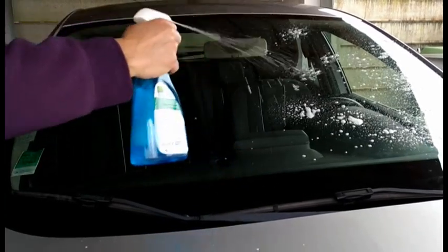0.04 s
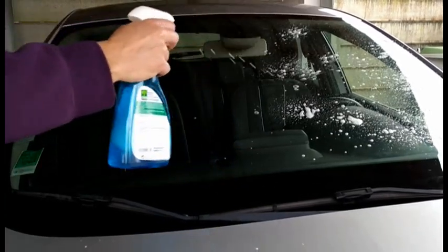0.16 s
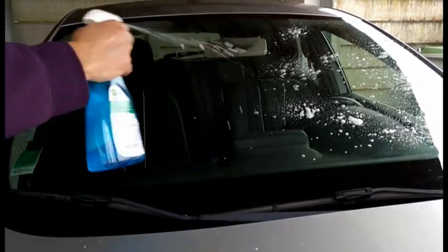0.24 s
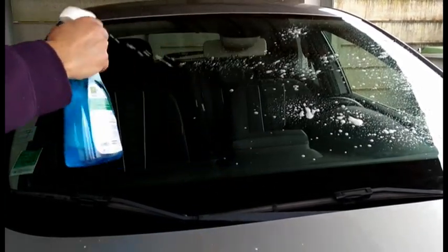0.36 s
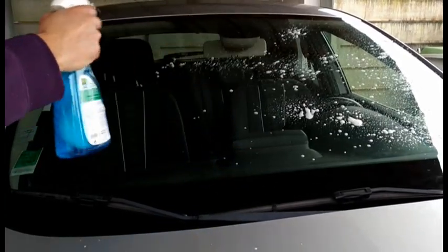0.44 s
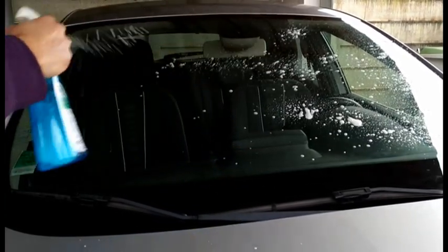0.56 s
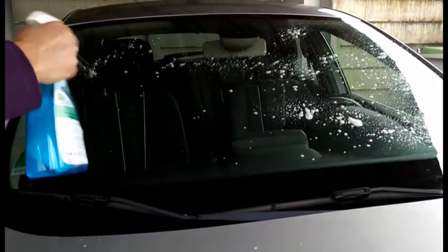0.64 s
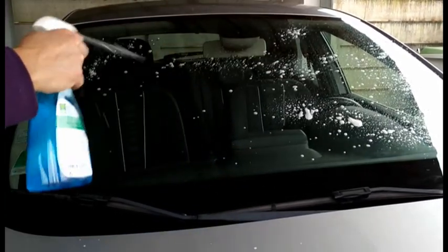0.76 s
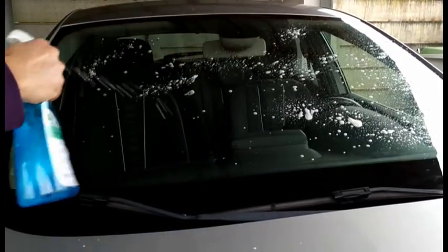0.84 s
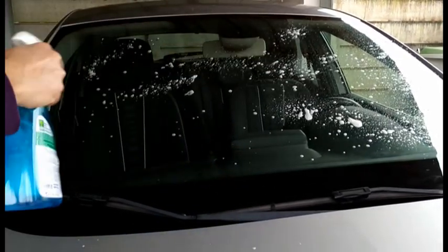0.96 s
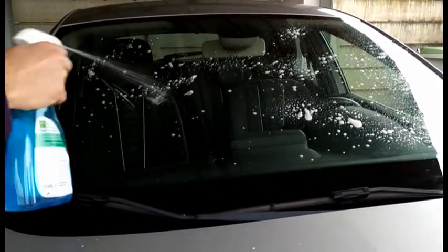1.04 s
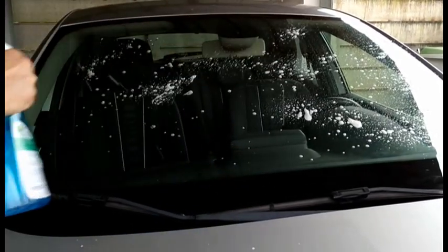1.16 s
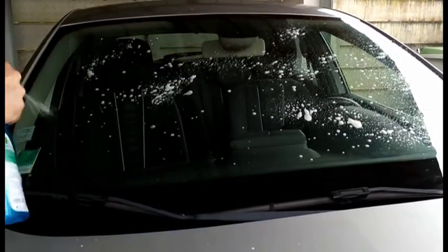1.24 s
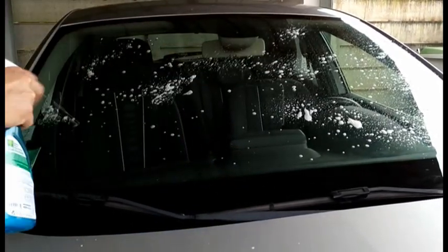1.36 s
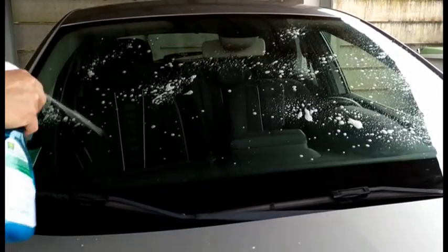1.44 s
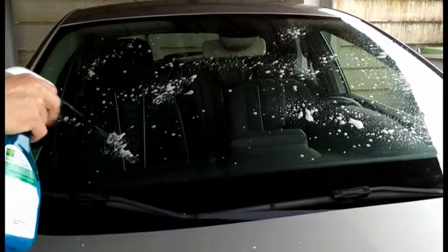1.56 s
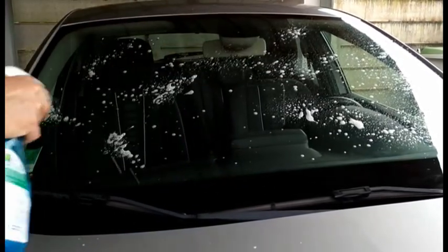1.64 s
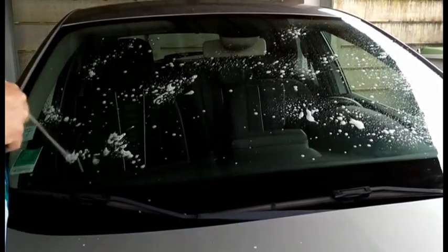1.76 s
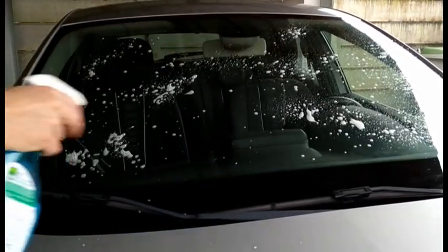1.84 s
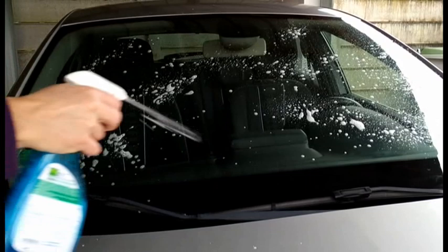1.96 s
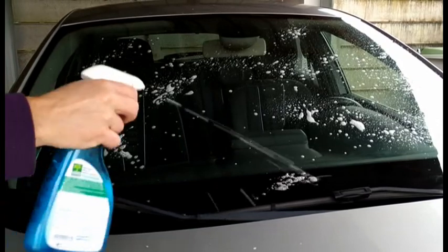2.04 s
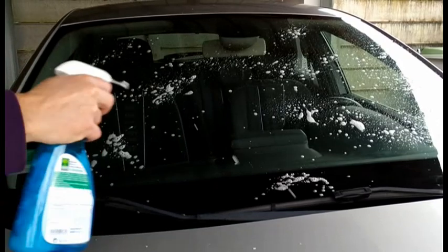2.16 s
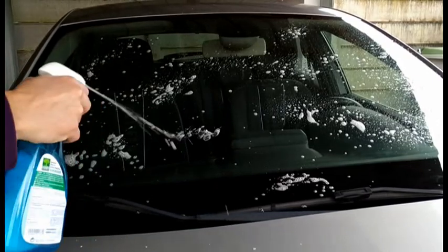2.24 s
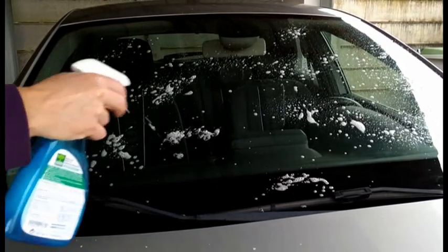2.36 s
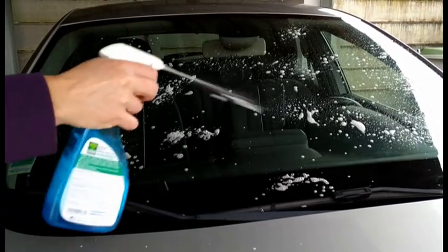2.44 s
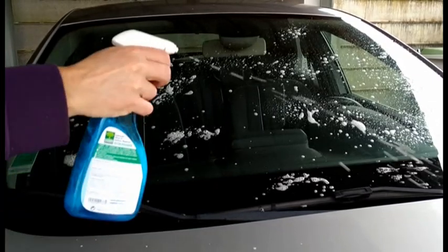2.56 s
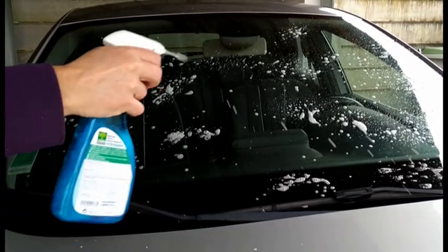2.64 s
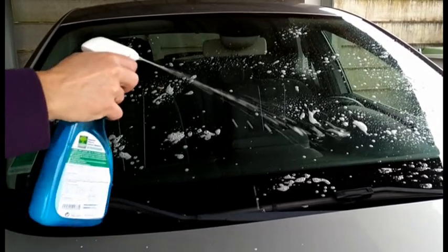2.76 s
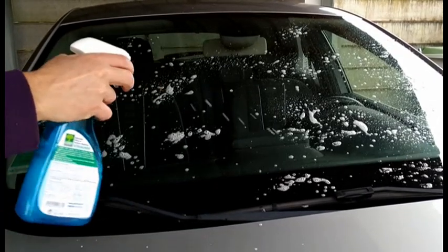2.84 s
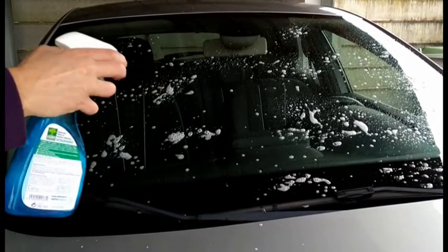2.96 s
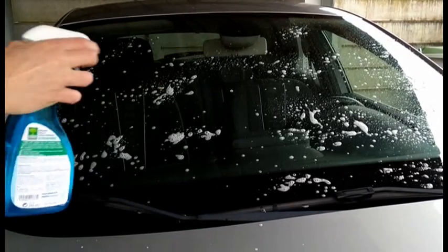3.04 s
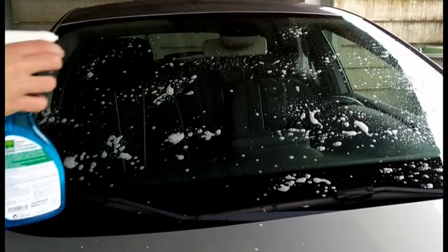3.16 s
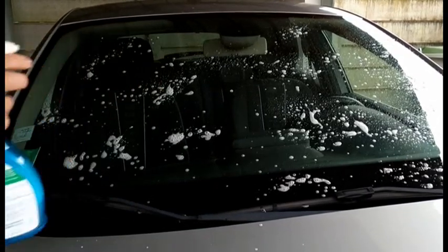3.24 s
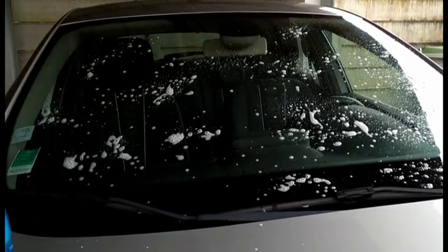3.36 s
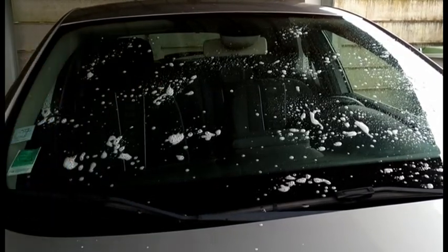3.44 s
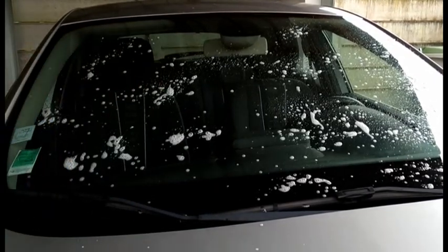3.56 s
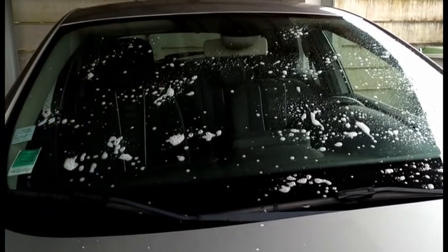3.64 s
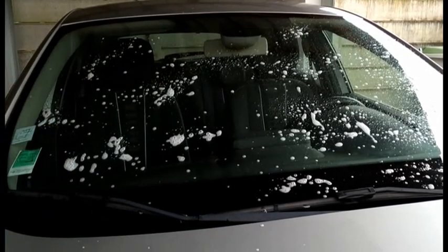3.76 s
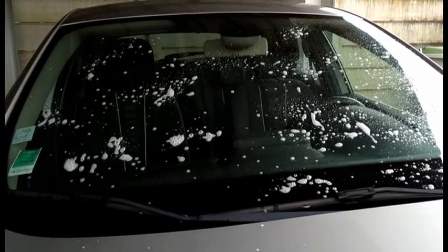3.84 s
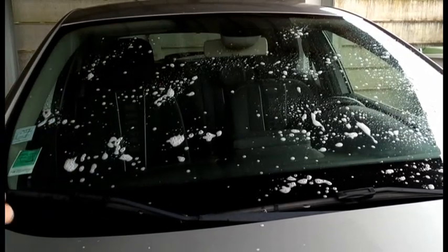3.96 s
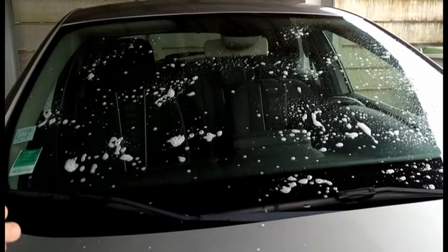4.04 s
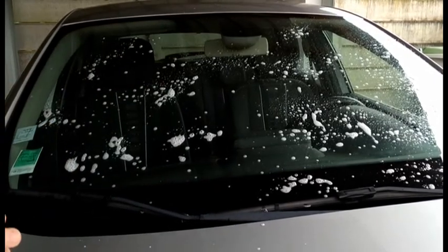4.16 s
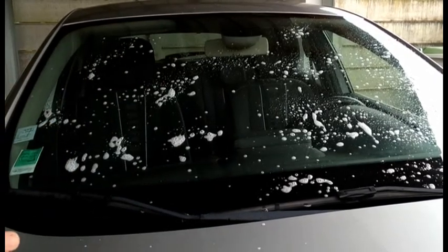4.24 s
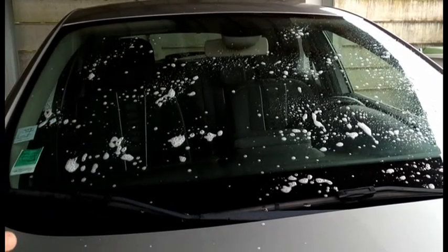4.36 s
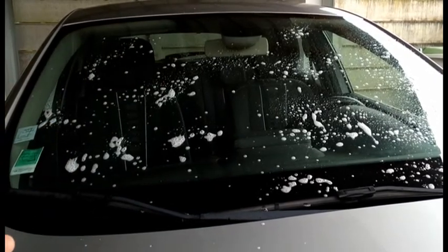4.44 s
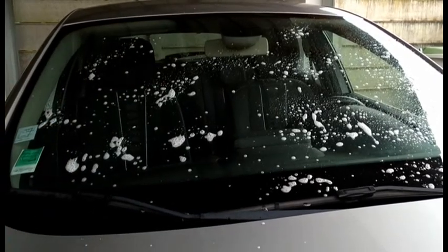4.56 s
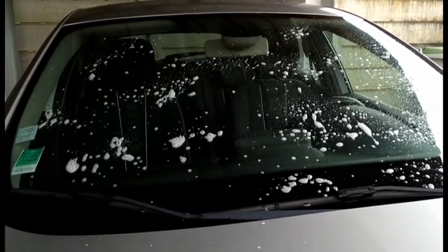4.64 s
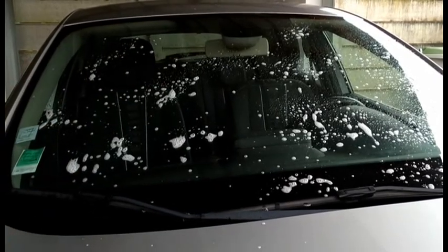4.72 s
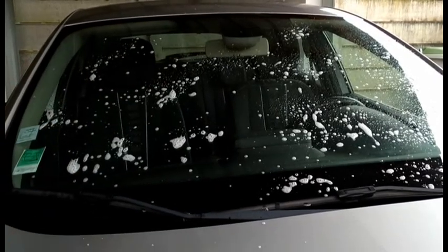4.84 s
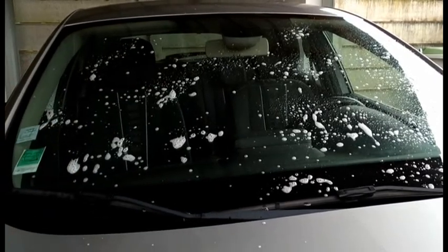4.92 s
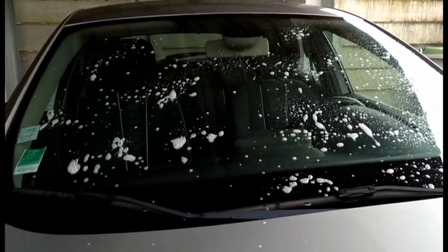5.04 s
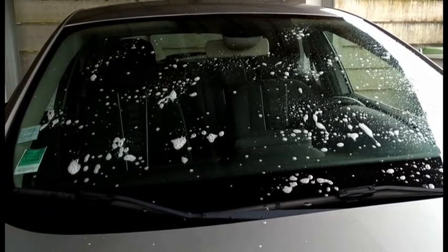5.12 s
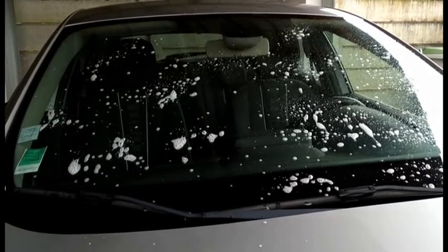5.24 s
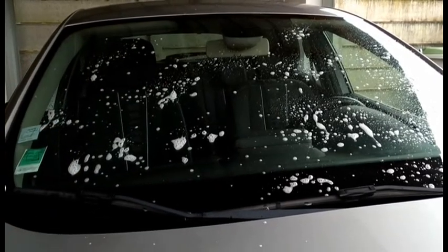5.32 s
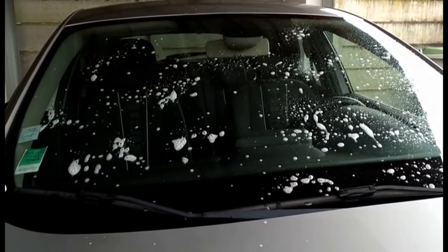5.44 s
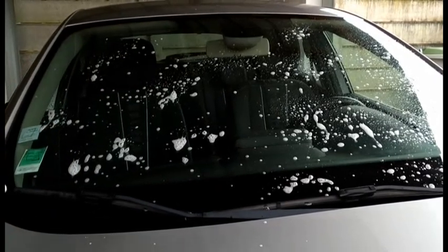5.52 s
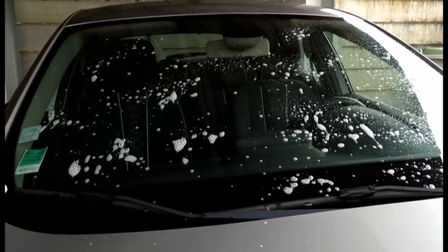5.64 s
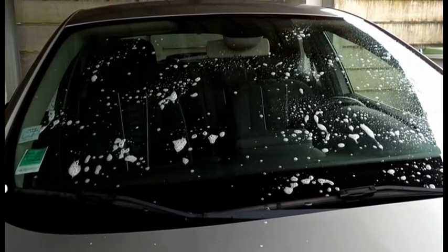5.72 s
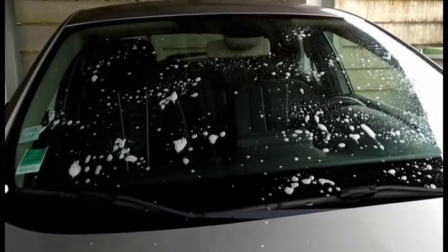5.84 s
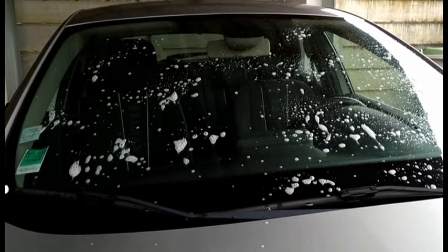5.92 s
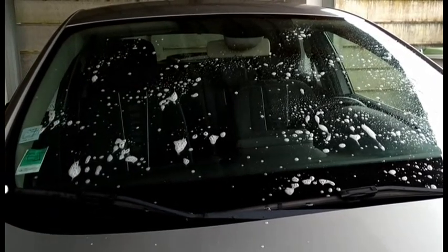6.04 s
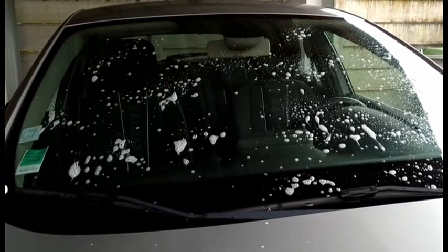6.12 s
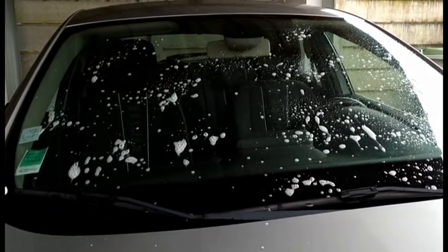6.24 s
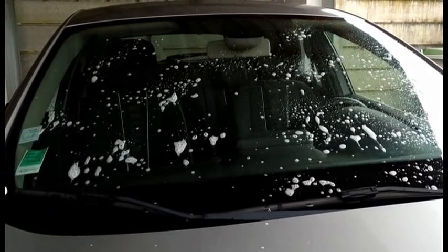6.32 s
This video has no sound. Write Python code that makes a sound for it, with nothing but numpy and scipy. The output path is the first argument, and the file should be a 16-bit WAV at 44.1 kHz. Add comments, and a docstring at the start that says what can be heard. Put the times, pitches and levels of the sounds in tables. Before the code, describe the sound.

A spray bottle squirts rapidly a dozen times, is set down with a hollow resonant knock, and quiet sleeve rustles and small ticks follow outdoors.

```python
"""A trigger bottle fires twelve quick squirts of cleaner at a car windscreen, under a carport.
Each squirt is shaped hiss with droplet ticks; between squirts the pump sucks in liquid as soft noise.
The bottle is set down with a hollow knock of ringing modes, boom and crack, and rocks.
A sleeve swishes and rubs as the arm withdraws, among dull noise ticks of handling; a far bird chirps in
gliding sines. Low rumble, later fainter and lumpy with short swells, and airy wash are filtered noise."""
import sys
import numpy as np
from scipy import signal
from scipy.fft import rfft, irfft, next_fast_len
from scipy.io import wavfile
from scipy.ndimage import uniform_filter1d, map_coordinates

SR = 44100
rng = np.random.default_rng(int(sys.argv[2]) if len(sys.argv) > 2 else 0)


def to_wav(sig):
    """Store sig (one row per channel, or 1-D mono) as 16-bit WAV at the path in sys.argv[1].

    Samples outside -1..1 are clipped; the rate is SR.
    """
    pcm = np.clip(np.atleast_2d(sig), -1, 1) * 32767
    pcm = np.round(pcm).astype(np.int16)
    wavfile.write(sys.argv[1], SR, pcm.T)  # frames by channels


N = 281608

# trigger pulls: (t/s, stroke length/s, relative level/dB, splash/dB)
PULLS = [(0, .11, -32, -9), (0.223, .13, -33, -2.5), (0.494, .14, -33.5, -0.5), (.755, .12, -31.5, -4.5),
         (1.014, 0.098, -31, -3.5), (1.225, 0.13, -32, -3.5), (1.456, 0.093, -29.5, -4),
         (1.698, .12, -32, -6.5), (1.96, 0.084, -29.5, -3), (2.186, .13, -31.5, -6),
         (2.455, .089, -28.5, -5.5), (2.684, .11, -30, -7)]


def amp(db):
    """Decibels to gain."""
    return 10 ** (np.asarray(db) / 20)


def unit(x):
    """Scale to rms 1."""
    return x / np.sqrt(np.mean(x ** 2) + 1e-20)


def along(points, hz):
    """Read (f/Hz, value) points on a log frequency axis."""
    f, v = np.transpose(points)
    return np.interp(np.log(hz + 1), np.log(f), v)


def clock(length):
    """Sample times over a length in seconds."""
    return np.arange(int(length * SR)) / SR


def wobble(rate, size):
    """A smooth random curve through rate knots a second."""
    knots = rng.standard_normal(int(size * rate / SR) + 4)
    return map_coordinates(knots, [np.arange(size) * rate / SR])


def filtered(x, gain):
    """Apply a gain, real or complex, that depends on frequency."""
    size = x.shape[-1]
    m = next_fast_len(size + 8192)  # padding keeps the filter's tail from wrapping round
    spectrum = rfft(x, m) * gain(np.fft.rfftfreq(m, 1 / SR))
    return irfft(spectrum, m)[..., :size]


def noise(spectrum, size, width):
    """Coloured stereo noise of rms 1; width 0 is mono, 1 has unrelated ears."""
    mid, side = filtered(rng.standard_normal((2, size)), lambda hz: amp(along(spectrum, hz)))
    return unit(np.array([mid + width * side, mid - width * side]))


def add(out, s, x):
    """Mix x into out from time s on."""
    i = int(np.clip(round(s * SR), 0, N - 1))
    out[:, i:i + x.shape[-1]] += x[..., :N - i]


def carport(x, wet_db):
    """Roof and walls answer with a decaying noise tail, drawn anew on each call."""
    # reverberation time of the carport: (f/Hz, t60/s)
    decay_times = [(150, 0.15), (1000, 0.52), (4000, 0.21), (9000, 0.2), (15000, 0.31)]
    hz, t, z = signal.stft(rng.standard_normal((2, SR // 2)), SR, nperseg=256)
    decay = amp(-60 * t / along(decay_times, hz)[:, None])
    tail = signal.istft(z * decay, SR, nperseg=256)[1]
    tail = tail / np.linalg.norm(tail[0])
    return x + amp(wet_db) * signal.fftconvolve(x, tail, axes=1)[:, :x.shape[-1]]


def patchy(x, depth_db, band_count, frame_count):
    """Gain drifts at random in narrow bands, giving the noise a patchy texture."""
    z = signal.stft(x, nperseg=512)[2]
    # one part of the drift differs between the ears, the other is common to both
    field = rng.standard_normal(z.shape) + rng.standard_normal(z.shape[1:])
    field = uniform_filter1d(field, band_count, 1)
    field = uniform_filter1d(field, frame_count, 2)
    return signal.istft(z * amp(depth_db * unit(field)), nperseg=512)[1][:, :x.shape[-1]]


def from_right(x, lag):
    """Sound from the right reaches the left ear lag seconds later."""
    return filtered(x, lambda hz: np.exp(1j * np.pi * hz * lag * np.array([[-1], [1]])))


def mist(size, drop_rate, drop_db):
    """Turbulent air is steady noise, with the sparse ticks of single droplets (drop_rate a second) in it."""
    drops = (rng.random((2, size)) < drop_rate / SR) * rng.standard_normal((2, size))
    return rng.standard_normal((2, size)) + amp(drop_db) * unit(drops)


def mirrored(hz, strength, count):
    """Glass, bottle and hand throw back near copies that comb the hiss differently at each ear."""
    delay = rng.uniform(0.000593, .005, (2, count, 1))  # seconds
    return 1 + strength * np.exp(-2j * np.pi * hz * delay).sum(axis=1)


def squirts(rise=0.04, close=0.022, arch_db=3, flutter_db=0.8, level_db=2.5):
    """Each pull builds pressure, drives the jet for one stroke and lets it die away."""
    # colour of the nozzle's hiss: (f/Hz, relative level/dB per Hz)
    jet_colour = [(600, -26), (1700, -23), (2500, -8.5), (3000, -9.5), (3600, -8.5), (4300, 1),
                  (5100, -1.5), (8300, .5), (10500, -3), (12200, -10), (13500, -12), (15700, -14.5)]
    # stereo lean of the hiss: (f/Hz, left over right/dB)
    jet_lean = [(1500, -1.5), (2800, -4), (4400, -2.5), (6100, 6), (8000, -4.5), (9100, 2.5), (11000, -2),
                (13500, 12), (15500, -7.5)]
    # every pull moves the same dose: half the time, this much brighter
    usual_stroke_s, bright_db_per_octave = 0.1, 3.5
    pan_db = 1.2  # left over right: the bottle is held a little to the left
    out, t = np.zeros((2, N)), clock(.5)
    for s, stroke, db, splash_db in PULLS:
        # the first pull is already under way
        opening = np.sin(np.pi / 2 * np.clip(t / rise + (s < rise), 0, 1)) ** 2
        arch = amp(-arch_db * (2 * t / stroke - .9) ** 2)  # the finger is fastest near mid-stroke
        closing = np.exp(-np.maximum(t - stroke + 0.0027, 0) / close)
        pressure = opening * arch * closing
        flutter = amp(flutter_db * wobble(168, len(t)))
        jet = pressure * flutter * mist(len(t), drop_rate=1500, drop_db=-5)
        # a quicker pull atomises more finely and sounds brighter; coarse drops splash lower on the glass
        bright_db = bright_db_per_octave * np.log2(usual_stroke_s / stroke)
        fine = lambda hz: bright_db * along([(5500, -0.46), (9000, 1.0), (14000, -0.51)], hz)
        coarse = lambda hz: splash_db * along([(3300, 0.77), (4300, 0.31)], hz)
        ears = lambda hz: np.array([[.5], [-.5]]) * (along(jet_lean, hz) + pan_db)
        tone = lambda hz: amp(along(jet_colour, hz) + fine(hz) + coarse(hz) + ears(hz))
        colour = lambda hz: tone(hz) * mirrored(hz, strength=0.17, count=6)
        hiss = filtered(carport(jet, wet_db=-1.5), colour)
        hiss = patchy(hiss, depth_db=2.7, band_count=3, frame_count=14)
        add(out, s, amp(db + level_db) * np.sqrt(np.mean(pressure ** 2)) * unit(hiss))
    return out


def outdoors(air_db=-63):
    """A wavering rumble of far traffic, heard fainter and lumpier late on, under a wash of open air."""
    # colour of the far traffic: (f/Hz, relative level/dB per Hz)
    rumble_colour = [(25, -7), (50, -12.5), (85, 1), (125, 2), (165, -2), (210, -3.5), (310, -8),
                     (420, -12), (600, -18), (1200, -35)]
    # colour of the open air: (f/Hz, relative level/dB per Hz)
    air_colour = [(150, -22), (310, -13), (390, 3), (900, -2.5), (1600, -9), (3000, -15), (4200, -16),
                  (6000, -21), (12000, -24), (15700, -27)]
    traffic_db, steady_waver_db = -58.5, 1.94
    # late on the rumble's level is turned down and its waver deepens
    gate_s, gate_fade_s, gate_drop_db, gate_waver_db = 4.17, .7, 12, 5.5
    gate = np.clip((np.arange(N) / SR - gate_s) / gate_fade_s, 0, 1)
    waver_db = steady_waver_db * (1 - gate) + gate_waver_db * gate
    rumble_db = traffic_db - gate_drop_db * gate + waver_db * wobble(18, N)
    rumble = amp(rumble_db) * noise(rumble_colour, N, width=0.084)
    rumble = patchy(rumble, depth_db=2, band_count=1, frame_count=10)
    air = amp(air_db + 1.2 * wobble(4.69, N)) * noise(air_colour, N, width=0.98)
    return from_right(rumble + air, lag=0.00038)


def refills(lead=0.048, length=0.1, db=-59, release=2.958):
    """Before each later pull, and on letting go, the trigger springs back and the pump sucks in liquid."""
    suck_colour = [(500, 1.5), (1500, -3.0), (4000, -1.0), (9000, 0.5), (15000, -8.5)]  # (f/Hz, dB per Hz)
    out, u = np.zeros((2, N)), clock(length) / length
    for s in [row[0] - lead for row in PULLS[1:]] + [release]:
        suck = noise(suck_colour, len(u), width=0.83)
        gurgle = amp(db + 3.4 * wobble(120, len(u)))
        add(out, s, gurgle * np.sin(np.pi * u) * suck)
    return out


def taps(t60=0.078, wet_db=0):
    """Fingers and plastic touch with short, dull ticks: decaying noise gathered around one pitch."""
    # light handling touches: (t/s, relative level/dB, pitch f/Hz)
    touches = [(.366, -49.5, 1230), (1.395, -52.5, 690), (1.603, -52, 785), (3.006, -48.5, 650),
               (3.591, -44.5, 1940), (4.636, -53, 1970), (5.414, -56.5, 2020), (5.803, -43.5, 696),
               (5.905, -39.5, 2450)]
    out, t = np.zeros((2, N)), clock(0.12)
    for s, db, hz in touches:
        body = [(hz / 5, -18), (hz / 2, -6), (hz, 0), (hz * 1.8, -5), (hz * 2.2, -16), (hz * 4, -28)]
        add(out, s, noise(body, len(t), width=0.79) * amp(db - 3.0 - 60 * t / t60))
    return carport(out, wet_db)


def sleeve(swish_db=1.0, grain_db=-0.3, catch_db=1.3):
    """Cloth slides in strokes: fibres swish, and the folds add a lower, catching rub."""
    # moves of the arm: (t/s, length/s, relative swish level/dB, relative rub level of the folds/dB)
    moves = [(3.474, 0.14, -68.5, -77), (3.569, .06, -61.5, -60), (3.846, 0.0194, -51, -70),
             (3.884, 0.091, -45, -65), (4.72, 0.2, -69, -69), (4.882, 0.033, -57.5, -59),
             (4.943, 0.092, -59.5, -54), (5.082, 0.095, -56, -62), (5.399, 0.026, -62, -66),
             (5.652, .06, -50.5, -57), (5.72, 0.064, -60, -53.5), (5.784, 0.15, -53.5, -51),
             (6.308, .03, -51.5, -59)]
    # colour of the sliding fibres: (f/Hz, relative level/dB per Hz)
    swish_colour = [(400, -5), (1200, 1), (3000, -3), (5000, -5), (9000, 1.5), (13000, -4), (15700, -7)]
    # colour of the rubbing folds: (f/Hz, relative level/dB per Hz)
    fold_colour = [(60, -22), (300, -12), (550, -2.5), (1100, 2.5), (1800, -9), (3000, -11.5), (6000, -22)]
    # each move starts quickly, slows and comes to rest
    attack_s, sag_db_per_s, release_s = 0.024, 14, 0.046
    out, t = np.zeros((2, N)), clock(.5)
    for s, length, db, fold_db in moves:
        start = np.sin(np.pi / 2 * np.clip(t / attack_s, 0, 1)) ** 2
        rest = np.exp(-np.maximum(t - length, 0) / release_s)
        speed = start * amp(-sag_db_per_s * t) * rest
        swish = amp(db + swish_db) * noise(swish_colour, len(t), width=1.0)
        rub = amp(fold_db + catch_db * wobble(68, len(t))) * noise(fold_colour, len(t), width=0.84)
        add(out, s, speed * (swish + rub))
    grain = amp(grain_db * wobble(140, N))
    return patchy(out * grain, depth_db=2.5, band_count=5, frame_count=8)


def knocks(ring_db=-6, boom_db=-5, boom_t60=0.42, crack_t60=0.23):
    """The bottle lands hard, then rocks; longer, softer contacts wake only the low modes."""
    # contacts of the bottle: (t/s, relative level/dB, contact time/s, relative crack level/dB)
    contacts = [(3.858, -21.5, 0.0012, -12), (3.874, -35.5, 0.00089, -25), (3.893, -29.5, 0.0018, -31),
                (3.957, -32.5, 0.0017, -11), (4.041, -29, 0.0033, -21), (4.074, -31, 0.0016, -19),
                (4.1, -29.5, 0.0042, -48), (4.149, -34, 0.0033, -29), (4.205, -46, 0.0023, -18)]
    # modes of the bottle and the hollow panel under it: (f/Hz, relative level/dB, t60/s)
    modes = [(58, -12, .35), (91.3, -9.5, 0.76), (121.6, -5.5, 0.34), (152.6, -2, 0.29), (169, -8.5, 0.3),
             (229.8, -8, 0.47), (254, 0, 0.16), (299.3, -4, 0.43), (357, 0.5, 0.17), (446, -7, 0.44),
             (541, -3, 0.31), (580, -18, 0.17), (630, -12, 0.31), (716, -1.5, 0.15), (698, -22, 0.15),
             (907, -2.5, 0.28), (929, -3.5, 0.18), (969, -0.5, 0.14), (945, -2, 0.16), (1136, -4, 0.44),
             (1078, -8.5, 0.42), (1110, -17, 0.28)]
    # colour of the panel's dense ring: (f/Hz, relative level/dB per Hz)
    boom_colour = [(35, -15), (60, -1.5), (140, -1.5), (200, -8), (310, 5.5), (430, -1.5), (560, -5),
                   (800, -7.5), (960, -3.5), (1400, -22), (3000, -43)]
    # colour of the crack: (f/Hz, relative level/dB per Hz)
    crack_colour = [(200, -6), (600, -4), (1300, -7), (2500, -7.5), (4000, -20), (9000, -29.5),
                    (15000, -42)]
    out, t = np.zeros((2, N)), clock(0.99)
    hz, mode_db, t60 = np.transpose(modes)[:, :, None]
    for s, db, contact, crack_db in contacts:
        soften = lambda f: 1 / np.sqrt(1 + (1.57 * f * contact) ** 4)
        # each contact wakes the modes a little differently
        strength = amp(mode_db + rng.normal(0, 1.5, hz.shape)) * soften(hz)
        # higher modes radiate less evenly and reach the ears out of step
        ear_phase = rng.standard_normal((2, len(hz), 1)) * (hz / 950) ** 2
        phase = rng.uniform(0, 2 * np.pi, hz.shape) + ear_phase
        ring = (strength * amp(-60 * t / t60) * np.sin(2 * np.pi * hz * t + phase)).sum(axis=1)
        boom = filtered(noise(boom_colour, len(t), width=0.12), soften)
        boom = boom * amp(boom_db - 60 * t / boom_t60)
        crack = noise(crack_colour, len(t), width=0.68) * amp(crack_db - 60 * t / crack_t60)
        onset = 1 - np.exp(-t / 0.00036)
        add(out, s, amp(db) * (amp(ring_db) * ring + boom + crack) * onset)
    return from_right(carport(out, wet_db=-20.0), lag=.00022)


def bird():
    """Three faint falling notes from far away: gliding sines with a trembling pitch."""
    # notes: (t/s, length/s, start f/Hz, end f/Hz, level before the echo/dB)
    notes = [(4.441, 0.061, 4280, 4160, -70.5), (4.488, .04, 3570, 3400, -72),
             (4.543, 0.062, 3350, 3270, -71)]
    out = np.zeros((2, N))
    for s, length, from_hz, to_hz, db in notes:
        u = clock(length) / length
        hz = from_hz + (to_hz - from_hz) * u + 110 * wobble(302, len(u))
        add(out, s, amp(db) * np.sin(np.pi * u) * np.sin(2 * np.pi * np.cumsum(hz) / SR))
    return carport(out, wet_db=5)


def rumble_swells(length=0.068):
    """Short swells of low rumble come through late on: narrow noise around a low pitch."""
    # the strongest swells: (t/s, level before the fade in and out/dB, pitch f/Hz)
    swells = [(4.939, -59.5, 210), (5.091, -57.5, 168), (5.69, -57, 145), (5.815, -52, 80),
              (5.86, -53, 165), (6.06, -52, 200), (6.33, -57, 180)]
    out, u = np.zeros((2, N)), clock(length) / length
    for s, db, hz in swells:
        body = [(hz / 3, -24), (hz / 1.33, -5), (hz, 0), (hz * 1.13, -6), (hz * 1.65, -30), (hz * 8, -80)]
        add(out, s, amp(db) * np.sin(np.pi * u) * noise(body, len(u), width=0.24))
    return out


def scene():
    """Everything heard in front of the car."""
    return squirts() + outdoors() + refills() + taps() + sleeve() + knocks() + bird() + rumble_swells()


def record(dry, low_hz=38, top_hz=15850):
    """The deepest bass rolls off steeply, and nothing is left from top_hz up."""
    return filtered(dry, lambda hz: (hz < top_hz) * (1 - 1 / (1 + (hz / low_hz) ** 6)))


dry = scene()
out = record(dry)
to_wav(out)
```